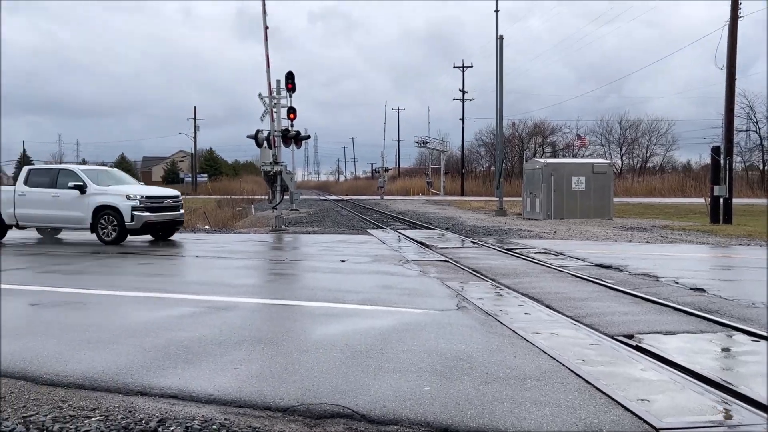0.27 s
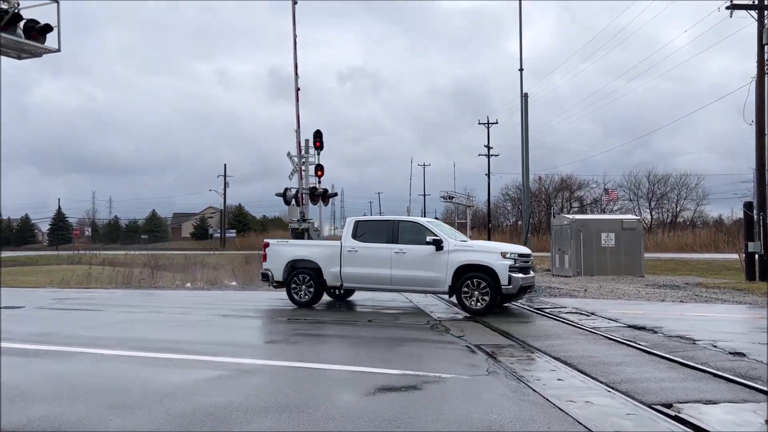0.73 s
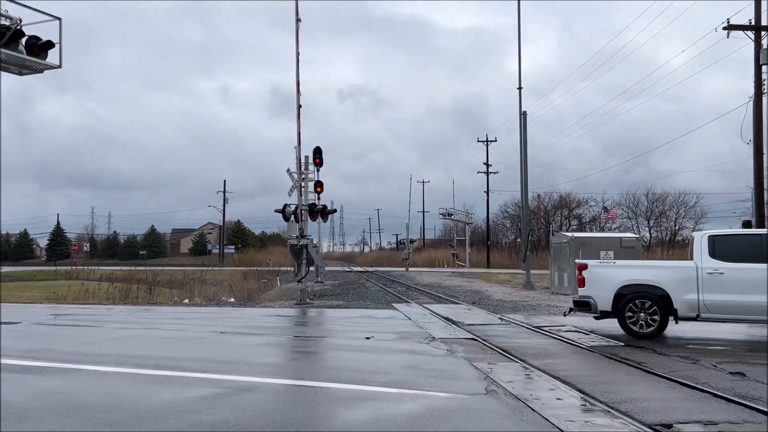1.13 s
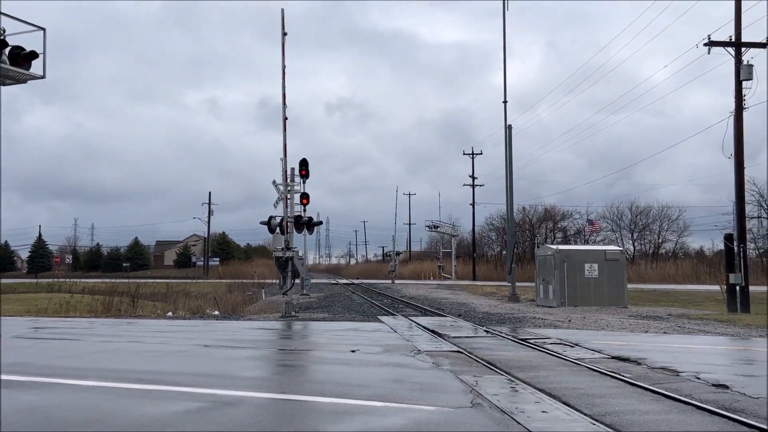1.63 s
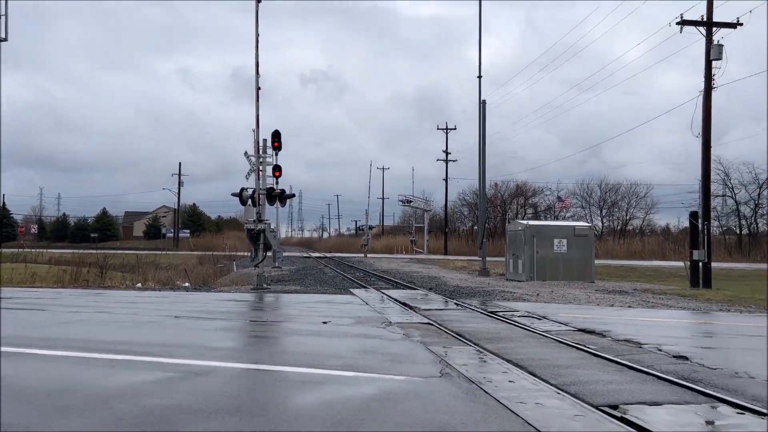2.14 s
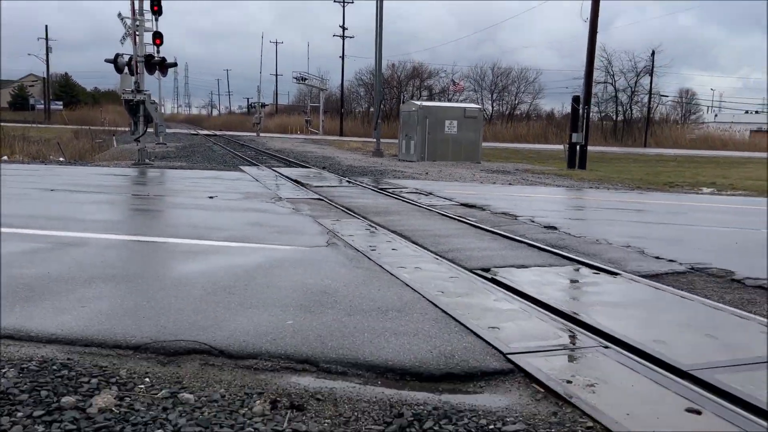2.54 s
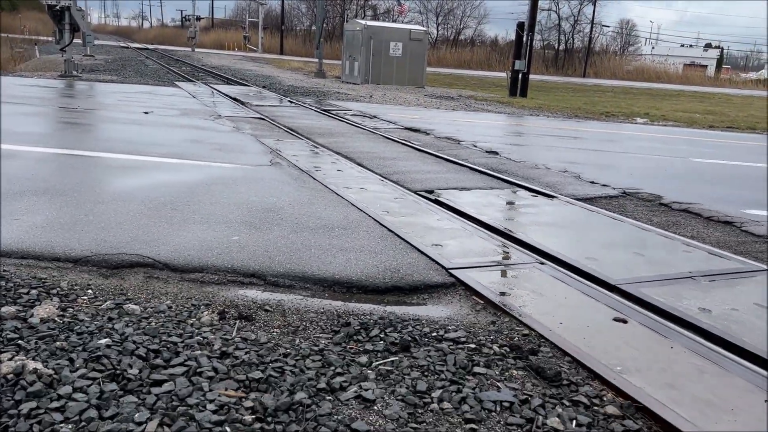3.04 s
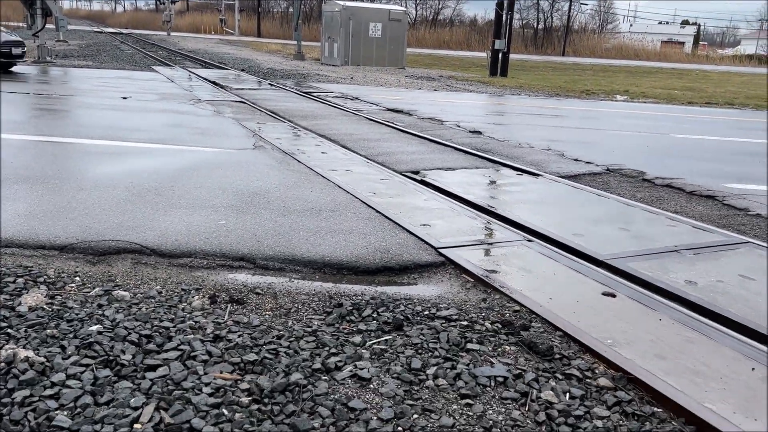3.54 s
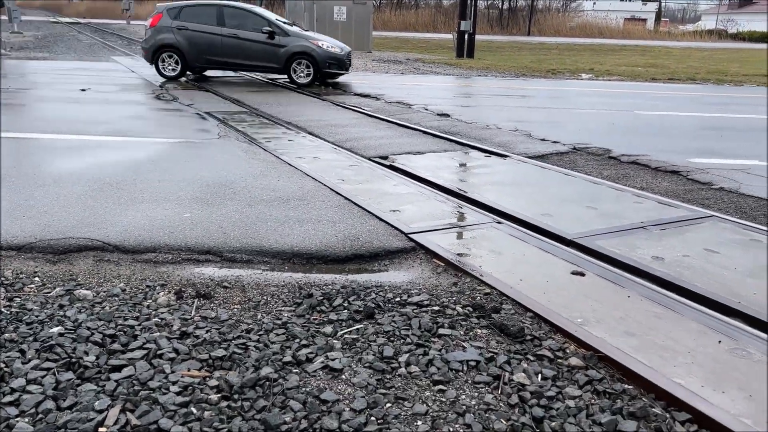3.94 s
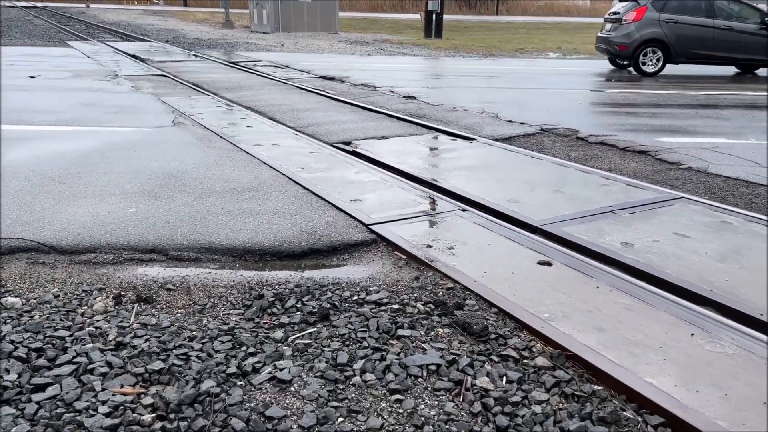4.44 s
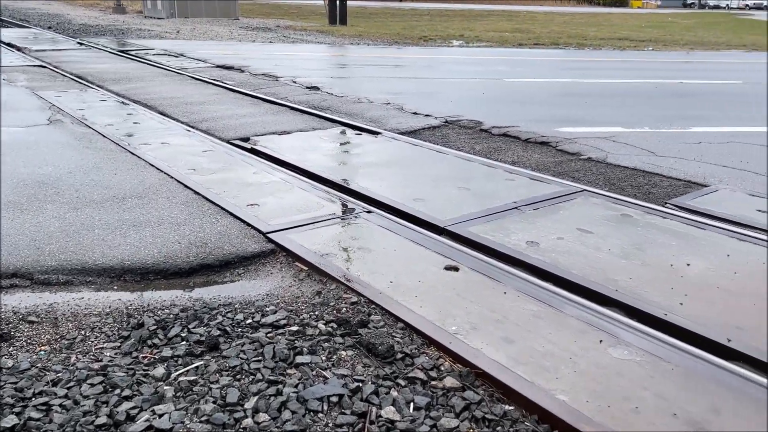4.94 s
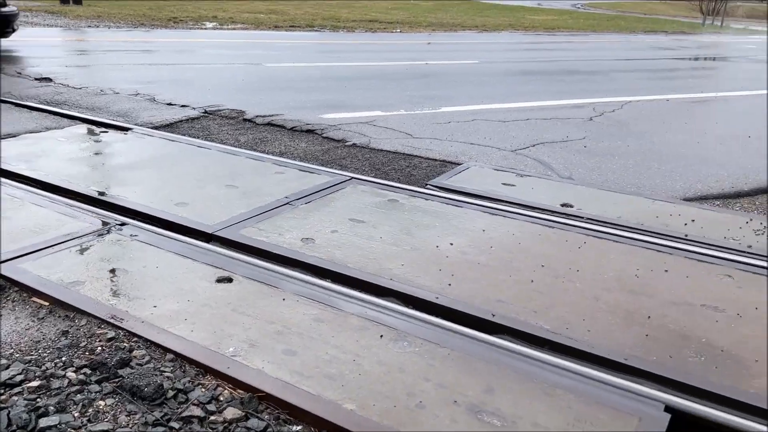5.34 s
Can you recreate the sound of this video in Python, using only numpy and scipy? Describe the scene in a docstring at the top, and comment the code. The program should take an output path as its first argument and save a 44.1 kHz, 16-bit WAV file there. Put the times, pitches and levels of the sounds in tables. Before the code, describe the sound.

An open roadside at a wet rail crossing, heard through hand-held stereo microphones exposed to gusty wind. From the start, tyre roar and watery hiss approach from the left, with wind fluttering from 0.2 s. A crisp double puddle slap comes at about 0.6 s, then light rattling knocks from 0.8 s and heavier dull thumps between 1.0 and 1.25 s as the pickup crosses and moves right. Its noise lingers and thins; wind rumbles, with the hardest low buffets around 2.2 to 2.5 s. A brighter, sizzling tyre hiss builds after 3 s, with fine spatter near 3.7 to 3.9 s. The small car passes around 4.0 to 4.3 s, fuller in roar, with a quick cluster of dry knocks, and another at 4.6 s, amid gusts. Spray stays strong as a third vehicle nears from the left; a thump at 5.35 s, then the strongest knock and a splash at 5.5 s, under renewed wind, end it.

```python
"""Wet tyres roar and hiss from left to right: two vehicles pass over a level crossing, then a third nears.
Puddles slap and spatter, rail gaps knock, and gusty wind buffets a hand-held pair of microphones.
Tyres and water are coloured, flickering noise placed by arrival time and level at two ports; knocks ring
damped modes; wind is random eddies and strong puffs, dispersed so that each falls in pitch."""
import sys
import numpy as np
from scipy import signal
from scipy.fft import rfft, irfft, next_fast_len
from scipy.io import wavfile
from scipy.ndimage import uniform_filter1d, map_coordinates

SR = 44100
rng = np.random.default_rng(int(sys.argv[2]) if len(sys.argv) > 2 else 0)


def digitize_waveform(pressure):
    """Quantize a signal to 16-bit integers and store it at the path in sys.argv[1].

    Rows of a 2-D input are taken as channels; values are limited to [-1, 1].
    """
    field = np.atleast_2d(pressure).T
    bounded = np.clip(field, -1, 1)
    quanta = np.round(bounded * 32767).astype(np.int16)
    wavfile.write(sys.argv[1], SR, quanta)


N = 246783
SIZE = next_fast_len(N + SR // 2)   # transform length, padded for late sound
HZ = np.maximum(np.arange(SIZE // 2 + 1) * SR / SIZE, 1)

# Levels common to all tyres. Each row: time in seconds, then tread roar, tread sizzle and spray in relative dB.
TYRE_LEVELS = [(0.0, -32, -36, -35.5), (0.2, -30, -34.5, -34), (0.38, -29, -38, -35.5),
               (0.47, -29.5, -40, -32.5), (0.56, -26.5, -38, -34.5), (0.65, -30, -35.5, -36),
               (0.85, -27.5, -38.5, -37), (1.0, -29.5, -37.5, -39.5), (1.18, -28, -37, -35.5),
               (1.27, -29, -38, -38), (1.6, -29.5, -38, -38.5), (1.68, -27.5, -39.5, -36.5),
               (1.95, -30.5, -38.5, -38), (2.2, -29.5, -38.5, -41), (2.55, -36, -38.5, -43),
               (3.08, -28, -32, -44.5), (3.16, -30.5, -33, -39), (3.4, -27.5, -33.5, -38.5),
               (3.63, -28, -27.5, -36.5), (3.88, -29, -29, -35.5), (4.02, -27, -32, -37.5),
               (4.32, -25, -30, -36.5), (4.55, -28.5, -27.5, -34.5), (4.74, -31, -30, -33.5),
               (5.07, -29.5, -30.5, -29), (5.3, -29.5, -31, -33), (5.6, -29.5, -29.5, -34.5)]
# Level added to roar, sizzle and spray in turn, in dB.
LAYER_DB = (0, 3.5, 2)
# Passing of each vehicle: time abeam in seconds, time to cover its passing distance in seconds.
PICKUP = (1.0, 0.8)
HATCHBACK = (4.27, 0.5)
THIRD_CAR = (5.9, 0.7)
# What each vehicle's tyres add to the common colour. Each row: frequency in Hz, gain in dB.
PICKUP_TONE = [(400, 0), (750, 3.5), (1050, -8), (1250, -2.5), (1450, -8), (1700, 6.5), (2300, -12.5),
               (3000, 1.5), (3850, -7.5), (4500, 6), (5300, -20), (8000, -3)]
HATCHBACK_TONE = [(400, -6), (750, 4.5), (1100, -4), (1400, -4), (1700, -5), (2300, -6), (3000, -9.5),
                  (3600, 0.5), (5300, -3.5), (7000, -32), (8300, -7)]
THIRD_CAR_TONE = [(400, 2.5), (750, 6), (1350, -5), (1700, 1), (2300, 13), (5300, 6)]
# When each vehicle in turn takes the lead. Each row: roar, sizzle and spray times in seconds.
LEADS = [(-2, -1.0, -3), (2.5, 0.7, 1.5), (5, 6, 7.5)]
MIST_DB, MIST_FOLLOWS = -37.5, 1.32   # fine mist at a spray of -36 dB; it swings more than the spray
PLACED_SPRAY_DB = -6.5   # the part of the spray that comes straight from the wheels


def tyres():
    """Direct and scattered sound: each vehicle plays from its bearing, with an unplaced part around it."""
    levels_db = [level + db for level, db in zip(in_time(TYRE_LEVELS), LAYER_DB)]
    levels_db.append(MIST_DB + MIST_FOLLOWS * (levels_db[2] + 36))
    surge = from_db(0.88 * drift(9.2))   # uneven water film
    out = gliding_bands() + splash()
    cars = (PICKUP, HATCHBACK, THIRD_CAR)
    tones = (PICKUP_TONE, HATCHBACK_TONE, THIRD_CAR_TONE)
    layer_shares = [shares(starts) for starts in np.transpose(LEADS)]
    for car, tone, roar_share, sizzle_share, water_share in zip(cars, tones, *layer_shares):
        roar, sizzle, water = tyre_layers(levels_db, surge)
        direct_water = water_share * from_db(PLACED_SPRAY_DB) * water
        common = roar_share * roar + sizzle_share * sizzle + direct_water
        own = filtered(common, response([(1, 0)] + tone + [(SR, 0)]))
        out = out + placed(own, bearing_ms(car))
    scattered = np.array([tyre_layers(levels_db, surge) for port in range(2)])
    for layer, db in enumerate((-4.5, -2.5, 0.1)):   # roar, sizzle, water
        out = out + from_db(db) * scattered[:, layer]
    return out


# Colours of the tyre layers. Each row: frequency in Hz, relative spectral level in dB.
ROAR = [(150, -2), (400, -5.5), (650, -0.5), (850, 2), (1150, 0.5), (1500, -7), (2500, -19)]
SIZZLE = [(800, -9.5), (1250, -1.5), (1600, 0), (2100, -1), (2700, -3.5), (3400, -18), (5000, -54)]
SPRAY = [(1800, -24), (2900, 4), (3600, 3.5), (5000, -1.5), (6000, -0.5), (7500, -17), (9500, -38)]
MIST = [(4500, -1.5), (6200, 2.5), (7200, 3.5), (8400, 2), (9500, -1), (10500, -10), (12500, -20.5),
        (14000, -22), (15700, -2.5)]


def tyre_layers(levels_db, surge):
    """Broadband radiation: fresh tread and water noise, shaped in frequency and in time."""
    roar_db, sizzle_db, spray_db, mist_db = levels_db
    roar = from_db(roar_db) * hiss(ROAR, 1.5, 61)
    sizzle = from_db(sizzle_db) * hiss(SIZZLE, 1.63, 45)
    water = from_db(spray_db) * hiss(SPRAY, 0.8, 40) + from_db(mist_db) * hiss(MIST, 2.25, 15.4)
    return roar, sizzle, surge * water


HANDOVER_S = 0.36   # time constant of the change of lead


def shares(starts):
    """Power crossfade: each vehicle in turn takes the common sound from the one before."""
    t = np.arange(N) / SR
    come = [.5 + .5 * np.tanh((t - start) / HANDOVER_S) for start in starts] + [0]
    return [np.sqrt(now * (1 - later)) for now, later in zip(come, come[1:])]


# Narrow bands that stand out of the tyre hiss and glide up or down; with the first two times swapped
# a glide runs backwards. Each row: start in seconds, end in seconds, from Hz, to Hz, relative peak in dB,
# left over right in dB.
GLIDES = [(-0.33, 0.62, 5400, 5100, -36.5, 5.5), (0.052, 0.43, 4400, 4800, -32.5, -5),
          (-0.05, 0.16, 6400, 6700, -35.5, -3), (0.44, 0.58, 5200, 6600, -30.5, -3),
          (0.54, 0.6, 7000, 8400, -33.5, -2), (0.8, 1.27, 1170, 1310, -34, 2),
          (1.5, 1.26, 6000, 5700, -40, 3), (0.5, 1.24, 1756, 1700, -44, 1), (1, 1.36, 700, 560, -28.5, -4),
          (2.5, 2.95, 1750, 1800, -35.5, -3.5), (2.7, 3.22, 1700, 1500, -34, -5),
          (2.4, 3.102, 5780, 6000, -43.5, 4.5), (2.952, 4, 1898, 2400, -35.5, -7),
          (3, 3.62, 1070, 990, -34, 11), (3.08, 3.3, 2600, 3130, -34.5, -5), (3, 3.5, 3100, 2700, -35, -7),
          (3.131, 3.38, 6180, 5900, -42, -13), (3.299, 3.951, 3140, 4500, -41, -8),
          (4, 4.3, 850, 810, -30.5, 1), (4, 4.5, 720, 1350, -27.5, -6), (4.48, 4.8, 1050, 1030, -34, -8),
          (4.5, 5.28, 1601, 2420, -32.5, -10.5), (4.55, 5.5, 4000, 5100, -39.5, -14),
          (5, 5.6, 1750, 1650, -36.5, -1), (4.9, 5.8, 930, 830, -34.5, 10)]
GLIDE_WIDTH = 0.16   # width of the band as a share of its mean pitch
GLIDE_FLICKER_DB = 1.5   # wet grain


def gliding_bands():
    """Modulation: low-passed noise on a gliding carrier is a moving band, stronger at one port."""
    t, out = np.arange(N) / SR, np.zeros((2, N))
    for start, end, from_hz, to_hz, peak_db, pan_db in GLIDES:
        way = np.clip((t - start) / (end - start), 0, 1)
        lowpass = signal.butter(2, GLIDE_WIDTH * (from_hz + to_hz) / 4, fs=SR, output="sos")
        slow = signal.sosfilt(lowpass, rng.standard_normal((2, N)))
        cycles = np.cumsum(from_hz + (to_hz - from_hz) * way) / SR
        band = rms_one(np.real((slow[0] + 1j * slow[1]) * np.exp(2j * np.pi * cycles)))
        port_gains = from_db([[peak_db + pan_db / 2], [peak_db - pan_db / 2]])
        out += port_gains * np.sin(np.pi * way) * band
    out *= from_db(GLIDE_FLICKER_DB * drift(37))
    return np.array([pair(port, nearest_ms())[k] for k, port in enumerate(out)])


# Wheels through puddles. Each row: start in seconds, slap in relative dB, spatter in relative dB,
# rise in seconds, lag of the left port in ms.
SPLASHES = [(0.581, -25, -30, 0.0082, 0.067), (0.608, -20.5, -21, 0.0036, 0.086),
            (3.715, -46, -26.5, 0.018, -0.28), (3.75, -46, -30, 0.019, -0.26),
            (3.905, -54, -28.5, 0.014, -0.26), (4.226, -28, -32, 0.006, -0.086),
            (5.385, -50, -40, 0.016, 0.49), (5.535, -23, -25.5, 0.0067, 0.42)]
# Colours of slap and spatter. Each row: frequency in Hz, relative spectral level in dB.
SLAP = [(1000, -24), (1600, -1), (2000, -5), (2600, 3.5), (3250, 6), (3900, 2), (4800, -20), (6500, -40)]
SPATTER = [(3000, -8), (5000, 6.5), (6500, 0.5), (8500, 0), (9500, 0), (12500, -20), (15700, -7)]


def splash():
    """Transient noise: a slap and a brighter spatter swell and die together at each puddle."""
    t, swell = np.arange(N) / SR, np.zeros((2, N))
    for s, slap_db, spatter_db, rise, _ in SPLASHES:
        age = np.maximum(t - s, 0) / max(rise, .002)
        swell += from_db([[slap_db], [spatter_db]]) * (age * np.exp(1 - age)) ** 2
    s, lag_ms = np.array(SPLASHES)[:, [0, 4]].T
    latest = np.maximum(np.searchsorted(s, t) - 1, 0)
    noise = swell[0] * hiss(SLAP, 2.0, 300) + swell[1] * hiss(SPATTER, 1.5, 200)
    return placed(noise, lag_ms[latest])


# Wheels on the rail gaps. Each row: time in seconds, relative strength in dB, extra for bright modes in dB.
KNOCKS = [(0.809, -14.5, -4), (0.829, -16.5, 4.5), (0.834, -15, -1), (0.851, -15, 0), (0.926, -17, -4),
          (0.995, -11, -17), (1.003, -3.5, -22), (1.155, -6, -12), (1.224, -0.5, -22), (1.251, -3.5, -21),
          (3.114, -13.5, 4), (3.997, -20, 7), (4.024, -3.5, -20), (4.062, -9, -21), (4.079, -2.5, -13),
          (4.114, -6, -10.5), (4.16, -11, 0), (4.244, -1.5, -11), (4.325, -13, -18), (4.612, -4.5, -12),
          (5.353, -3.5, -25), (5.503, 4.5, -11), (5.513, 0, -22)]
# Modes of tyre and crossing panel. Each row: frequency in Hz, relative level in dB, 60 dB decay in seconds.
KNOCK_MODES = [(605, 8.5, 0.013), (790, 6, 0.013), (910, 5, 0.003), (1250, 13, 0.0095),
               (1730, 10.5, 0.0072), (2400, 9.5, 0.0057), (3300, 9.5, 0.0035)]
RATTLE_S, RATTLE_DB = 0.00501, -4   # random lateness scale and mean step of two further touches
CROSSING_MS = 0.19   # the rail gaps lie within this lag either side of straight ahead


def knocks():
    """Modal resonance: every knock is a short rattle that rings damped modes of tyre and panel."""
    s, peak_db, bright_db = np.transpose(KNOCKS)
    spread_db = rng.normal(0, 1.9, (len(s), len(KNOCK_MODES), 3))
    late = rng.random((len(s), 3)) * [0, 1, 2]
    times = (s[:, None] + RATTLE_S * late).ravel()
    out = 0
    for k, (hz, level_db, t60) in enumerate(KNOCK_MODES):
        r, w = from_db(-60 / (t60 * SR)), 2 * np.pi * hz / SR
        mode_db = peak_db + level_db + bright_db * (hz > 1100) - 14.5
        touch_db = mode_db[:, None] + RATTLE_DB * np.arange(3) + spread_db[:, k]
        blows = clicks(times, from_db(touch_db).ravel())
        ring = signal.lfilter([0, np.sin(w)], [1, -2 * r * np.cos(w), r * r], blows + 1e-18)
        out = out + (-1) ** k * ring
    return placed(out, np.clip(nearest_ms(), -CROSSING_MS, CROSSING_MS))


# Colours of the wind. Each row: frequency in Hz, relative spectral level in dB.
RUMBLE = [(20, -47), (40, -4.5), (60, 4), (100, 3.5), (170, -1), (260, -11), (420, -25.5), (800, -85)]
FLUTTER = [(120, -13.5), (230, 1), (330, 0.5), (480, -2.5), (800, -11), (1300, -24), (2500, -65)]
PUFF_CYCLES = 1.0966   # each pitch in an eddy arrives this many of its own cycles late


def wind():
    """Turbulent pressure: eddies hit the ports as puffs, bright edge first and low swing after it."""
    rumble, flutter = gusts()
    dispersion = falling(HZ, PUFF_CYCLES)
    low, high = response(RUMBLE) * dispersion, response(FLUTTER) * dispersion
    streams = []
    for flutter_db in (0, -7, -7):   # one stream reaches both ports; one more, with less flutter, is private to each
        born = rng.random(N) < 250 / SR   # 250 eddies per second on average
        sizes = from_db(2.63 * np.minimum(rng.exponential(1, N), 4))
        eddies = born * sizes * rng.choice([-1, 1], N)
        bright = flutter * from_db(flutter_db) * rms_one(filtered(eddies, high))
        streams.append(rms_one(filtered(eddies, low)) + bright)
    strong = puffs()
    lull = 1 / (1 + 0.24 * uniform_filter1d(np.abs(strong), size=1500))   # small eddies yield to a strong puff
    level = rumble * lull
    sweep_ms = 0.22 + 0.26 * drift(1.47)   # the eddies sweep past from changing sides
    shared = pair(level * streams[0] + strong, sweep_ms) * from_db([[0.3], [-0.3]])
    return shared + from_db(-3.0) * level * np.array(streams[1:])


# The strongest single puffs. Each row: time in seconds, rumble in relative dB, flutter in relative dB.
PUFFS = [(0.277, -17.5, -9), (0.429, -15.5, -9), (0.442, -20, -11), (0.456, -21.5, -9),
         (0.483, -21.5, -8.5), (0.494, -16, -8), (0.503, -20.5, -9), (0.511, -16, -12), (0.703, -17.5, -17),
         (0.739, -18, -28), (0.802, -25.5, -26), (0.955, -23, -7.5), (1.033, -14.5, -9), (1.166, -24, -11),
         (1.206, -20, -10), (1.223, -17.5, -21), (1.244, -20.5, -7.5), (1.259, -20.5, -7.5),
         (1.341, -8.5, -10.5), (1.295, -10, -17), (1.483, -13.5, -19), (1.512, -13, -14), (1.621, -24, -28),
         (1.731, -19, -26), (1.844, -13.5, -16), (2.009, -33, -10.5), (2.103, -34, -15), (2.215, -9, -4.5),
         (2.244, -3.5, -4), (2.266, -11, -31), (2.304, -11.5, -10), (2.361, -12.5, -9.5), (2.405, -5.5, -3),
         (2.43, -11, -12), (2.439, -5.5, -3), (2.47, -13.5, -35), (2.66, -9.5, -23), (2.714, -11.5, -10.5),
         (2.811, -21, -12.5), (2.964, -7, -42), (2.985, -17.5, -24), (3.098, -29, -26), (3.144, -20, -16),
         (3.322, -12, -14), (3.551, -20.5, -10.5), (3.593, -18, -10.5), (3.689, -24, -20),
         (4.163, -14.5, -47), (4.322, -16.5, -21), (4.373, -28, -11.5), (4.402, -7, -17),
         (4.529, -29.5, -22), (4.608, -10.5, -10.5), (4.62, -15, -14), (5.313, -14.5, -30),
         (5.447, -17.5, -29), (5.477, -13.5, -17), (5.579, -7, -19)]
STRONG_CYCLES = 1.25   # delay of a strong puff in cycles at a rumble of -8 dB
PUFF_FALL_PER_DB = 0.08   # cycles lost per dB of rumble below -8, gained above
SHARPEN_DB = 1.63   # dB per octave from 400 to 2500 Hz for each dB of flutter above -7.5
PUFF_TAIL_S, PUFF_TAIL_DB = 0.02, -1.5   # longest delay and level of three random fluttering eddies behind
LEAD_IN = 200   # samples kept ahead of a puff for its rounded leading edge


def puffs():
    """Superposed dispersed pulses: strong puffs one by one, each trailed by smaller eddies."""
    step, out = 32, np.zeros(N + SIZE)   # short pulses need only every 32nd frequency
    hz, low, high = HZ[::step], response(RUMBLE)[::step], response(FLUTTER)[::step]
    low, high = low / irfft(low).max(), high / irfft(high).max()
    octaves = np.log2(np.clip(hz, 400, 2500) / 400)
    for (s, low_db, high_db), chance in zip(PUFFS, rng.uniform(-1, 1, (len(PUFFS), 7))):
        sign = np.sign(chance[0])
        edge = high * from_db(SHARPEN_DB * (high_db + 7.5) * octaves)
        delays = PUFF_TAIL_S * np.abs(chance[4:])
        tail = chance[1:4] @ np.exp(-2j * np.pi * np.outer(delays, hz))
        bright = sign * edge + from_db(PUFF_TAIL_DB) * tail * np.minimum(edge, high)
        both = sign * from_db(low_db) * low + from_db(high_db) * bright
        cycles = np.clip(STRONG_CYCLES + PUFF_FALL_PER_DB * (low_db + 8), 0, 2)
        shape = np.roll(irfft(both * falling(hz, cycles)), LEAD_IN)
        at = int(s * SR) - LEAD_IN
        out[at:at + len(shape)] += shape
    return out[:N]


LOW_SWING = 26   # the deepest part of a puff drags further: extra delay in s times Hz squared


def falling(hz, cycles):
    """Dispersion: each pitch arrives a fixed number of its own cycles late, the deepest later still."""
    return np.exp(-2j * np.pi * (cycles * np.log(hz) - LOW_SWING / np.maximum(hz, 30)))


# Gusts at the ports. Each row: start in seconds, end of hold in seconds, rumble in relative dB,
# flutter over rumble in dB.
GUSTS = [(0.204, 0.531, -30.5, -1.5), (0.56, 0.7, -37, -25), (0.694, 1.155, -29.5, -1),
         (1.14, 1.876, -27.5, -3), (1.972, 2.011, -21.5, -6), (2.182, 2.285, -21, -9),
         (2.323, 2.465, -31, -28), (2.602, 3.025, -30.5, -12.5), (3.04, 3.184, -33.5, -2),
         (3.2, 3.84, -33.5, -19), (3.977, 4.63, -33, 0), (4.69, 4.81, -39, -8), (5.308, 5.45, -31, -2.5),
         (5.42, 5.7, -27.5, 0)]
GUST_RISE_S, GUST_FALL_S = 0.059, 0.02   # linear rise; time constant of the fall
CALM_DB, CALM_FLUTTER_DB = -41, -5   # what is left between gusts


def gusts():
    """Intermittency: gusts rise, hold and decay exponentially over a calm floor."""
    t = np.arange(N) / SR
    rumble = from_db(CALM_DB) + 0 * t
    flutter = rumble * from_db(CALM_FLUTTER_DB)
    for start, end, level_db, flutter_db in GUSTS:
        rise = np.clip((t - start) / GUST_RISE_S, 0, 1)
        fall = np.exp(-np.maximum(t - end, 0) / GUST_FALL_S)
        shape = from_db(level_db) * rise * fall
        rumble, flutter = rumble + shape, flutter + from_db(flutter_db) * shape
    return rumble, flutter / rumble


PORT_GAP_MS = 0.42   # travel time between the ports for a source end-on
SWING_AT_S, SWING_S, SWING_MS = 3.34, 0.19, 0.072   # the hand swings the microphones to the left and back


def bearing_ms(vehicle):
    """Interaural-style delay: lag of the left port for a source passing on a straight line."""
    t = np.arange(N) / SR
    abeam_s, passing_s = vehicle
    along = (t - abeam_s) / passing_s
    swing = SWING_MS * np.exp(-((t - SWING_AT_S) / SWING_S) ** 2)
    return PORT_GAP_MS * along / np.sqrt(1 + along ** 2) + swing


def nearest_ms():
    """Dominant bearing: the lag of each vehicle in turn, changing at set times."""
    t = np.arange(N) / SR
    return np.select([t < 2, t < 5.2], [bearing_ms(PICKUP), bearing_ms(HATCHBACK)], bearing_ms(THIRD_CAR))


def pair(x, lag_ms):
    """Time difference of arrival: one source at two ports, half the lag to each side."""
    n, half = np.arange(N), lag_ms * SR / 2000
    return np.array([map_coordinates(x, [n - side * half], order=3, mode="nearest") for side in (1, -1)])


SHADOW_DB_PER_MS = 3   # the nearer port is louder by this much for each ms of lead


def placed(x, lag_ms):
    """Acoustic shadow: a source is lagged at the far port and louder at the nearer one."""
    return pair(x, lag_ms) * from_db(SHADOW_DB_PER_MS * np.array([-lag_ms, lag_ms]) / 2)


def hiss(colour, flicker_db, rate):
    """Amplitude modulation: coloured noise whose level flickers, at unit rms."""
    noise = filtered(rng.standard_normal(N), response(colour))
    return rms_one(noise * from_db(flicker_db * drift(rate)))


def drift(rate):
    """Random modulation: low-passed noise with unit rms, made at every 40th sample."""
    r = np.exp(-80 * np.pi * rate / SR)
    noise = rng.standard_normal(N // 40 + 2002)
    slow = signal.lfilter([1], [1, -2 * r, r * r], noise)[2000:]   # drop the settling
    return np.interp(np.arange(N) / 40, np.arange(len(slow)), rms_one(slow))


def clicks(times, gains):
    """Impulse excitation: a click of the given size at each time."""
    out = np.zeros(N)
    np.add.at(out, np.clip((np.asarray(times) * SR).astype(int), 0, N - 1), gains)
    return out


def response(points):
    """Transfer function: gain at every frequency bin from (Hz, dB) points."""
    hz, db = np.transpose(points)
    return from_db(np.interp(np.log(HZ), np.log(hz), db, left=-120, right=-120))


def filtered(x, gain):
    """Linear filtering: multiply the spectrum by a frequency response."""
    return irfft(rfft(x, SIZE) * gain, SIZE)[..., :N]


def in_time(rows):
    """Envelope interpolation: columns of a curve table at every sample."""
    s, *columns = np.transpose(rows)
    return [np.interp(np.arange(N) / SR, s, c) for c in columns]


def from_db(db):
    """Logarithmic level: decibels to gain."""
    return 10 ** (np.asarray(db) / 20)


def rms_one(x):
    """Power normalisation: scale to unit rms."""
    return x / np.sqrt(np.mean(x ** 2) + 1e-20)


# Treble that the left channel takes from the right port, inverted. Each row: frequency in Hz, share from 0 to 1.
BORROWED = [(1500, 0.14), (2800, 0.78), (4500, 0), (6500, 0), (8000, 0.7), (10500, 0.88), (15000, 1)]
BORROW_MS = .294   # delay of the borrowed sound
# Difference in colour of the two ports. Each row: frequency in Hz, left over right in dB.
PORTS = [(60, 0.0), (110, 0), (200, 8), (380, -2), (700, 1.5), (1290, -0.5), (2380, -2.5), (4400, 5.5),
         (8120, 0), (15000, -0.5)]
# Gain on left minus right. Each row: frequency in Hz, gain in dB.
WIDTH = [(400, -3), (800, -1), (1300, 3.2), (2500, -2), (5000, -4.5), (8000, 1)]


def scene():
    """Superposition: road sound coloured by the ports and mixed between them, plus the wind on them."""
    left, right = tyres() + knocks()
    hz, amount = np.transpose(BORROWED)
    share = np.clip(np.interp(np.log(HZ), np.log(hz), amount), 0, 1)
    late = -np.exp(-2j * np.pi * HZ * BORROW_MS / 1000)
    left = filtered(left, np.sqrt(1 - share ** 2)) + filtered(right, share * late)
    lean = np.sqrt(response([(1, 0)] + PORTS + [(SR, 0)]))   # half the difference to each port
    left, right = filtered(np.array([left, right]), np.array([lean, 1 / lean]))
    side = filtered(left - right, response([(1, -17)] + WIDTH + [(SR, 0)]))
    return (left + right + side * [[1], [-1]]) / 2 + wind()


CUTOFF_HZ = 16100


def record(dry):
    """Soft saturation and band limiting: peaks are rounded and the top is cut."""
    rounded = 0.76 * np.tanh(dry / 0.85)
    return signal.sosfilt(signal.cheby2(12, 70, CUTOFF_HZ, fs=SR, output="sos"), rounded)


dry = scene()
out = record(dry)
digitize_waveform(out)
```